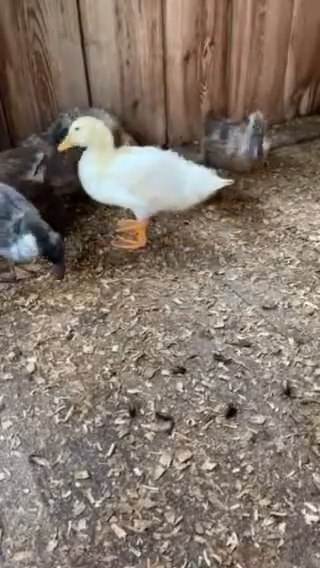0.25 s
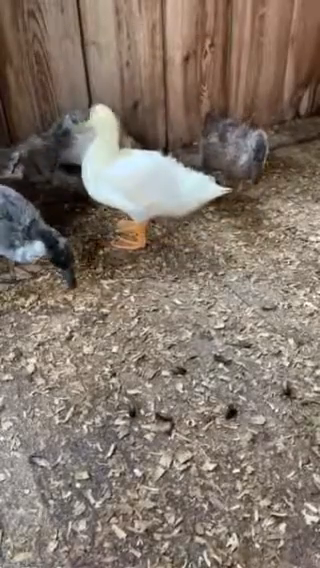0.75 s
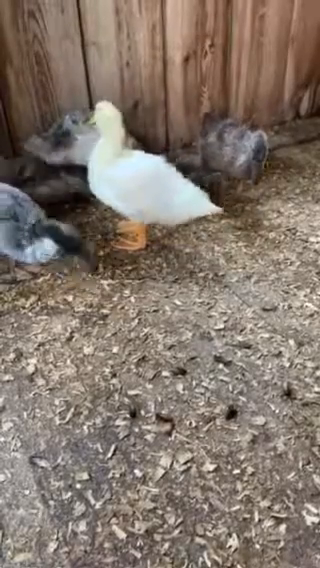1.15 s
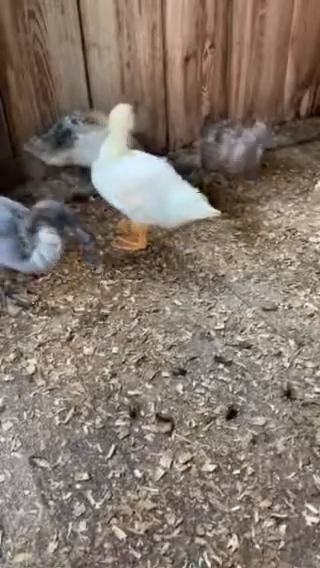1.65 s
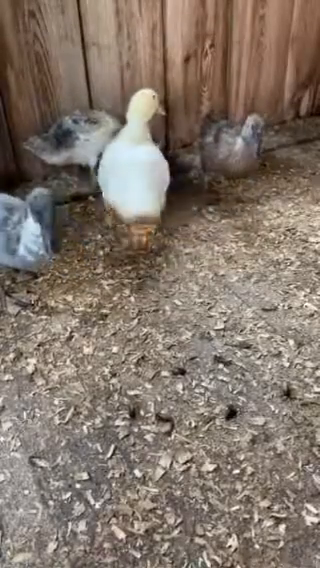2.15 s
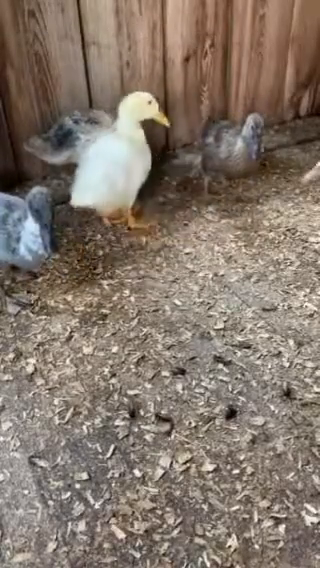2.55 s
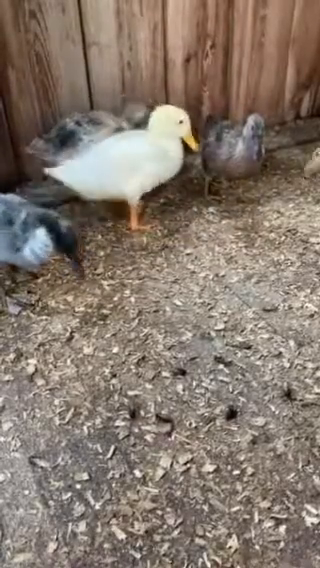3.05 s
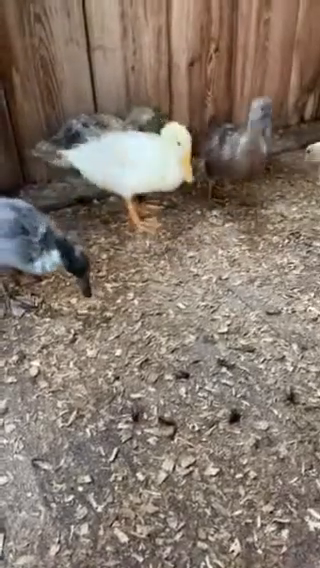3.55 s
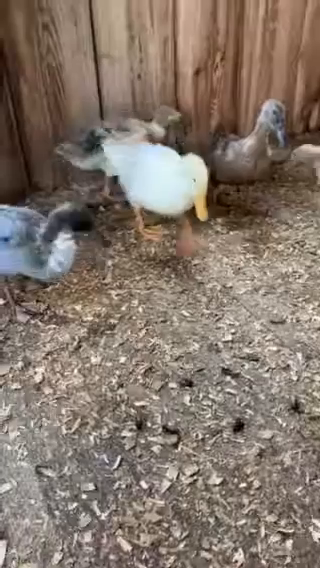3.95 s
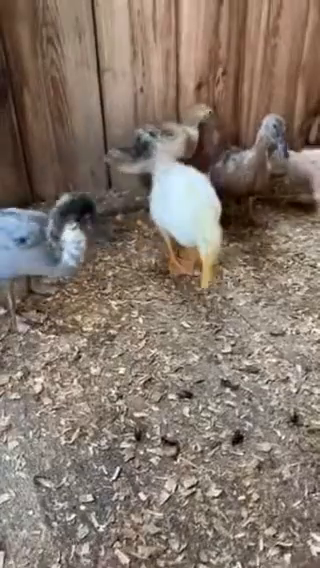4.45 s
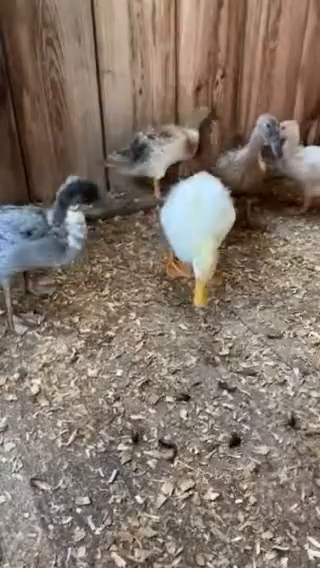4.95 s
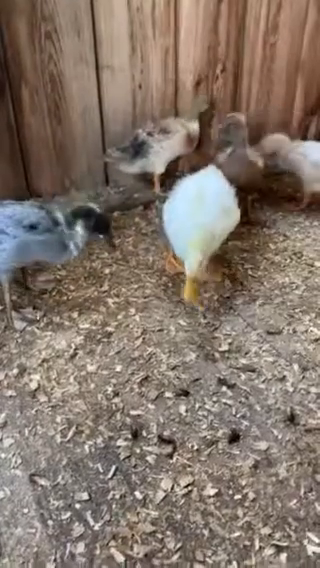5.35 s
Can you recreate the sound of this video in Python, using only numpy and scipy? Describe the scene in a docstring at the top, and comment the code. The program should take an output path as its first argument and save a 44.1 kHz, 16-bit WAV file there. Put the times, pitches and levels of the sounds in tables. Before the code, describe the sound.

Young ducks give soft, high, whistling peeps in loose bursts while feet thump and rustle through dry shavings in a small boarded pen.

```python
"""In a corner of a boarded pen, half-grown ducks whistle a couple of metres from a phone; a far bird chirps once.
Their near-sine calls waver, carry overtones and breath noise, and echo off the boards.
Feet thump and crunch the bedded floor as short ringing notes, and blows ring the modes of a wooden board.
Filtered noise makes the shavings rustle and tick, over outdoor air and a low rumble."""
import sys
import numpy as np
from scipy import signal
from scipy.io import wavfile
from scipy.ndimage import uniform_filter1d

SR = 44100
rng = np.random.default_rng(int(sys.argv[2]) if len(sys.argv) > 2 else 0)


def master(y):
    """Save y as 16-bit WAV."""
    cut = np.clip(np.atleast_2d(y).T, -1, 1)
    pcm = np.round(cut * 32767)  # scale
    wavfile.write(sys.argv[1], SR, pcm.astype(np.int16))


N = 246519

TREBLE_LIKE, MIDDLE_LIKE = .85, .3  # how alike left and right are: in the treble, and in ticks up to 6 kHz
LEFT_DELAY_S = .00027  # delay of the left channel in such sound


def undb(db):
    """Turn decibels into a plain gain."""
    return 10 ** (np.asarray(db) / 20)


def unit(x):
    """Scale a sound to an average (rms) level of 1."""
    return x / np.sqrt(np.mean(x ** 2))


def band(x, hz, width_hz):
    """Two-pole band-pass, gain 1 at the centre."""
    return signal.lfilter(*signal.iirpeak(min(hz, .4 * SR), hz / width_hz, fs=SR), x)


def walk(rate, size=N):
    """Smooth random wander, spread 1; a higher rate in Hz wanders faster."""
    k = max(int(SR / rate), 2)
    noise = rng.standard_normal(size + 2 * k)
    smooth = uniform_filter1d(uniform_filter1d(noise, k), k)
    return unit(smooth[k:-k])


def pair(x, like):
    """Mix two noises into a left and a right with the given likeness."""
    like = np.clip(like, -1, 1)
    shared = np.sqrt(1 + like) * x[0]
    apart = np.sqrt(1 - like) * x[1]
    return np.array([shared + apart, shared - apart]) / np.sqrt(2)


def late_left(x, like):
    """Mix two noises by the given likeness, with the left slightly delayed."""
    left, right = pair(x, like)
    return np.array([np.roll(left, int(LEFT_DELAY_S * SR)), right])


def add(out, s, x):
    """Lay a sound into the output, starting at s seconds."""
    i = int(s * SR)
    out[..., i:i + x.shape[-1]] += x[..., :N - i]


def curve(table):
    """Join the rows of a table by straight lines: each column becomes one value per sample."""
    s, *columns = np.transpose(table)
    return [np.interp(np.arange(N) / SR, s, c) for c in columns]


def uneven(shape, spread_db):
    """Noise whose samples differ widely in strength, like many small knocks."""
    size_db = spread_db * np.minimum(rng.exponential(size=shape), 6)
    return rng.standard_normal(shape) * undb(size_db)


def flakes(lo_hz, hi_hz, count, sharp, patchy_db, channels=2):
    """Many small pieces, each ringing briefly at its own pitch when uneven knocks excite it."""
    out = 0
    for hz in np.geomspace(lo_hz, hi_hz, count):
        ring = unit(band(uneven((channels, N), 3.5), hz, hz / sharp))
        out = out + ring * undb(patchy_db * walk(38.0))
    return unit(out)


# tone colour of the outdoor air: (f/Hz, relative level/dB)
YARD_AIR = [(15, -29), (25, -59), (216, 7), (448, -14.5), (636, -35), (953, -24.5), (1320, -19.5),
            (1470, -3), (2320, -74.5), (3570, -30.5), (7810, -60), (9690, -58), (15800, -63.5)]
YARD_DB = -64  # overall level of the air


def yard():
    """Outdoor air in third-octave bands that flicker alone, and a rumble that swells with footfalls."""
    air, (table_hz, table_db) = 0, np.transpose(YARD_AIR)
    for hz in 100 * 2 ** np.arange(0, 7.4, 1 / 3):
        noise = band(band(rng.standard_normal((2, N)), hz, hz / 3), hz, hz / 2)
        # the bass is alike left and right, the middle is not
        stereo = pair(noise, max(1.1 - hz / 900, 0)) if hz < 5000 else late_left(noise, TREBLE_LIKE)
        level_db = np.interp(np.log(hz), np.log(table_hz), table_db)
        air = air + stereo * undb(level_db + 5.7 * walk(24.0))
    noise = rng.standard_normal((2, N))
    deep = unit(band(band(noise, 40.0, 34), 43, 75))
    upper = unit(band(band(noise, 65.4, 30.0), 108.0, 60.0))
    rumble = pair(deep + .5 * upper, 0.88) * undb([[-.8], [.8]])
    return unit(air) * undb(YARD_DB) + rumble * boom()


BOOM_RISE_S, RUMBLE_DB = 0.027, -62  # time to the top of a swell; steady part of the rumble's gain


def boom():
    """Each footfall shakes the ground for a moment: a swell and decay over the steady rumble."""
    power = undb(RUMBLE_DB) ** 2 * undb(1.7 * walk(23.0))
    t = np.arange(int(.5 * SR)) / SR / BOOM_RISE_S  # time counted in rise times
    for s, *_, boom_db in FOOTFALLS:
        add(power, s, (undb(boom_db) * t * np.exp(1 - t)) ** 2)
    return np.sqrt(power)


# hiss high up, before the shuffling lifts it and the final mix trims it: (f/Hz, width/Hz, level/dB)
HIGH_HISS = [(8200, 960, -86), (11000, 2200, -90), (15100, 1300, -94)]
# shuffling in the bedding, before trims:
# (t/s, dull rustle level/dB, middle scrape level/dB, bright hiss level/dB)
BEDDING = [(0.0, -50.5, -83, -91), (0.25, -49.5, -47.5, -77), (0.4, -64, -64, -72),
           (0.75, -68.5, -83, -74.5), (1.09, -62.5, -64.5, -70.5), (1.5, -69, -72, -72),
           (1.9, -68, -72.5, -77), (2.09, -54.5, -88, -64), (2.17, -54.5, -67, -72.5),
           (2.4, -60, -79, -70.5), (2.68, -61.5, -54, -78.5), (2.94, -61.5, -83, -77.5),
           (3.15, -60, -58, -65), (3.36, -71, -71.5, -76), (3.52, -80, -49.5, -69), (3.66, -83, -96, -74),
           (3.9, -60, -70, -68.5), (4.4, -68.5, -88, -70.5), (4.62, -68, -85.5, -82.5),
           (4.67, -62, -66.5, -74), (4.76, -64, -67, -74), (4.97, -60.5, -63, -78),
           (5.15, -63.5, -64.5, -74.5), (5.22, -72.5, -73.5, -80), (5.3, -77.5, -87.5, -83),
           (5.34, -57, -76, -85), (5.42, -73, -82, -82), (5.59, -62, -67, -80.5)]


def shuffle():
    """Moving shavings: a dull, a middle and a bright layer; the bright one lifts the hiss up high."""
    rustle_db, scrape_db, hiss_db = curve(BEDDING)
    high = 0
    for hz, width_hz, db in HIGH_HISS:
        fine = late_left(uneven((2, N), 3), TREBLE_LIKE)
        hiss = unit(band(band(fine, hz, width_hz), hz, width_hz))
        high = high + hiss * undb(db + 1.9 * walk(21)) * (1 + undb(hiss_db + 78))
    scrape = flakes(1400, 2800, count=10, sharp=12, patchy_db=3) * undb(scrape_db - 2.0)
    bright = flakes(3270, 6220, count=6, sharp=9.4, patchy_db=6.0) * undb(hiss_db + 3 + 3.0 * walk(23))
    rustle = flakes(421, 1285, count=6, sharp=6.3, patchy_db=6.0) * undb(rustle_db)
    return rustle + scrape + bright + high


TICK_RISE_S, TICK_PAN_DB = .0045, -2  # quick swell; left minus right
# ticks in the shavings: (t/s, level/dB before trim, guide f/Hz, time to fall 60 dB/s before limits)
FLAKE_TICKS = [(0.192, -37.5, 3650, 0.51), (0.317, -41, 3950, 0.21), (0.442, -48, 3980, 0.25),
               (1.088, -46.5, 4000, 0.14), (0.924, -43, 8950, 0.019), (1.185, -47, 6300, 0.14),
               (1.329, -51, 4570, 0.21), (1.353, -53.5, 4500, 0.49), (1.5415, -52.5, 4400, 0.53),
               (1.656, -54, 8060, 0.34), (1.923, -39.5, 3470, 0.074), (1.947, -44, 3950, 0.46),
               (2.107, -41.5, 3570, 0.12), (2.595, -46.5, 7400, 0.12), (3.299, -46.5, 4860, 0.15),
               (3.481, -43.5, 5230, 0.22), (3.916, -39.5, 8650, 0.078), (3.982, -51, 9100, 0.34),
               (4.102, -45.5, 4700, 0.22), (4.196, -52, 4060, 0.45), (4.199, -41, 10600, 0.045),
               (4.266, -41.5, 7760, 0.09), (4.35, -45, 8400, 0.096), (4.667, -51.5, 4120, 0.23),
               (4.8, -47, 11100, 0.32), (4.826, -50, 4300, 0.21), (4.884, -32.5, 4960, 0.036),
               (4.894, -46.5, 4930, 0.29), (5.049, -57, 4380, 0.43), (5.5497, -55, 6200, 0.18)]


def ticks():
    """Dry flakes slide and snap: a quick swell, then a short uneven spray of noise."""
    out, t = np.zeros((2, N)), np.arange(int(.3 * SR)) / SR
    pan = undb([[TICK_PAN_DB / 2], [-TICK_PAN_DB / 2]])
    for s, db, hz, t60 in FLAKE_TICKS:
        like = TREBLE_LIKE if hz > 6000 else MIDDLE_LIKE
        noise = late_left(rng.standard_normal((2, len(t))), like)
        spray = unit(band(band(noise, 0.97 * hz, 0.59 * hz), 1.3 * hz, 1.93 * hz))
        spray = spray * undb(walk(360, size=len(t)))
        fall = undb(-60 * t / np.clip(t60, .02, .4)) + 0.98 * undb(-60 * t / 0.0067)  # slide and snap
        fall = fall * np.clip(t / TICK_RISE_S, 0, 1)
        add(out, s - .003, undb(db - 11.5) * spray * fall * pan)
    return out


# knocks on wood: (t/s, level/dB before the mode levels)
WOOD_KNOCKS = [(0.043, -46), (0.088, -50), (0.207, -57), (0.927, -45.5), (1.358, -68), (2.219, -45.5),
               (2.8623, -47.5), (4.339, -68), (5.05, -64.5)]
# ringing modes of the board: (f/Hz before small detuning, level/dB relative to the knock, time to fall 60 dB/s)
BOARD_MODES = [(238.7, 1.5, 0.19), (350, 1.5, 0.1), (775, 1, 0.076), (1232, 18, 0.031), (1321, 18.5, 0.029),
               (1620, 6, 0.043)]


def knocks():
    """Blows from a soft body ring the modes of a wooden board."""
    out, t = np.zeros(N), np.arange(int(.3 * SR)) / SR
    swell = np.clip(t / 0.008, 0, 1) ** 2  # a soft body hits, so the push builds up
    for s, db in WOOD_KNOCKS:
        for hz, mode_db, t60 in BOARD_MODES:
            size, tune = rng.standard_normal(2)  # every blow differs a little
            ring = np.sin(2 * np.pi * hz * (1 + 0.0068 * tune) * t)
            add(out, s, swell * undb(db + mode_db + 2.5 + size - 60 * t / t60) * ring)
    return out


STEP_T60_S, STEP_T60_SLOPE = 0.24, 0.58  # ring time of a 207 Hz note; power of pitch by which it grows
# footfalls, before trims: (t/s, level/dB, ground note f/Hz, crunch level/dB relative to the step, boom level/dB)
FOOTFALLS = [(0.044, -29.5, 247.4, 2, -55), (0.093, -27, 85.6, -6, -43), (0.191, -38.5, 209, -9, -60),
             (0.209, -28.5, 240, 2.5, -55), (0.28, -37, 237.4, 6.5, -55), (0.485, -54, 60.2, -23, -76),
             (0.566, -49, 126, 4.5, -80), (0.821, -44, 84, -37, -52), (0.929, -34.5, 247, -1, -55),
             (1.063, -33, 141, -14, -49), (1.217, -25, 65, -41, -43), (1.414, -34.5, 79.5, -32, -54.5),
             (1.656, -36.5, 151.3, -3, -47), (1.911, -45.5, 232, 3, -55.5), (2.05, -40, 242, 0, -80),
             (2.218, -41, 230.6, 7, -54.5), (2.593, -41, 345, -1, -47.5), (2.644, -38.5, 275, 3.5, -81),
             (2.864, -37, 224.7, -7, -73), (3.116, -42.5, 163, 7, -52.5), (3.253, -42.5, 291, 8.5, -63),
             (3.446, -43.5, 329, 1, -65), (3.499, -28.5, 86.3, -48, -43.5), (3.67, -48.5, 219, -15, -56),
             (4.017, -41.5, 198.6, -6.5, -46), (4.058, -39, 120, -38, -55), (4.264, -34, 170, -12, -59),
             (4.3, -32, 139.4, -48, -51), (4.35, -38, 210.5, -4, -48.5), (4.39, -43, 135, -50, -72),
             (4.533, -45, 191, -14, -58), (4.797, -39, 340, 0, -47.5), (4.926, -50, 460, 2, -60),
             (5.053, -37, 165, -13, -54), (5.134, -48, 155.5, -22, -62), (5.362, -34.5, 167, -31, -53.5),
             (5.394, -44.5, 235, -17, -61)]


def steps():
    """A foot lands as a push that rings the ground, part tone and part noise, and crunches the shavings."""
    thud, press = np.zeros(N), np.zeros(N)
    t = np.arange(int(.4 * SR)) / SR
    for s, db, hz, crunch_db, _ in FOOTFALLS:
        t60 = STEP_T60_S * (hz / 207.0) ** STEP_T60_SLOPE
        slow_tail = 0.058 * undb(-60 * t / 0.43) * (1 - t / t[-1])
        fall = undb(-60 * t / np.clip(t60, .03, .6)) + slow_tail
        fall = fall * np.clip(t / 0.0053, 0, 1)
        tone = np.sin(2 * np.pi * hz * t)
        ragged = unit(band(band(rng.standard_normal(len(t)), hz, 0.33 * hz), hz, 1.01 * hz))
        higher = unit(band(rng.standard_normal(len(t)), 2.7 * hz, 0.22 * hz))
        note = 0.38 * tone + 0.6 * ragged + 0.1 * higher
        add(thud, s - .003, undb(db - 1.5) * note * fall)
        add(press, s - .001, undb(db + crunch_db - 10.5) * fall)
    shavings = flakes(361, 2200, count=9, sharp=5.0, patchy_db=6.5)
    return thud, press * band(shavings, 1460, 1900)


PEN_T60_S = .18  # time in which the dull part of the echo falls 60 dB


def boards(x):
    """Echo of the pen: a decaying hail of reflections, duller with time, unlike left and right."""
    t = np.arange(int(.5 * SR)) / SR
    hail = rng.standard_normal((2, len(t))) * undb(8.1 * rng.standard_normal((2, len(t))))
    dull = signal.sosfilt(signal.butter(2, 2600, fs=SR, output="sos"), hail)
    tail = dull * undb(-60 * t / PEN_T60_S) + .5 * hail * undb(-60 * t / 0.01)
    tail = tail * (t > .004)  # the first reflection takes 4 ms
    return signal.fftconvolve(x[None], tail / np.sqrt(np.sum(tail[0] ** 2)), axes=1)[:, :N]


PEEP_TURN, PEEP_GLIDE = 0.61, 0.46  # turning point as a share of the length; share of the glide done by then
PEEP_START_DB, PEEP_END_DB = 0, -1.5  # level at both ends relative to the turning point
EFFORT = 0.28  # extra dB an overtone in SHORT_PEEPS loses per dB below the level at the turning point
RASP, THROB_HZ = .3, 61.15  # for SHORT_PEEPS: noisy flutter of the overtones, 0-1; beat of the throat
# short peeps of the ducks, and one high chirp of a distant bird at 1.48 s;
# pitch before wobble, level before trim, overtones relative to the level:
# (t/s, length/s, first f/Hz, last f/Hz, level/dB, 2nd harmonic level/dB, 3rd harmonic level/dB,
#  hoarseness/share, echo level/dB, left minus right level/dB, left lead/ms)
SHORT_PEEPS = [(0.035, 0.028, 1542, 1314, -41.5, -45, -29, 0.3, -19, 6, -0.0072),
               (0.197, 0.035, 2243, 2356, -53.5, -8, -25, 0.14, -3, 8, -0.064),
               (0.233, 0.021, 2410, 2480, -56, -25, -35, 0.32, -5, 3, 0.033),
               (0.252, 0.051, 1950, 1845, -53, -2, -25, 0.17, -5, 0, 0.3),
               (0.265, 0.037, 1773, 1463, -47, -30, -21, 0.3, -5, 8, -0.19),
               (0.288, 0.052, 1914, 1886, -43.5, -14.5, -29, 0.08, -14, 8.5, 0.17),
               (1.128, 0.032, 1826, 1320, -61.5, -30, -42, 0.25, -8, 2, 0.026),
               (1.481, 0.071, 7470, 7600, -69.5, -38, -48, 0.25, -2, 4, 0),
               (2.104, 0.086, 1690, 1880, -47.5, -17, -27, 0.83, -9, 3, 0.13),
               (2.227, 0.029, 1578, 1913, -52, -25, -9.5, 0.26, -3, -6, 0.14),
               (2.244, 0.041, 1988, 1843, -59.5, -2, -20, 0.32, -1, -1, 0.2),
               (2.264, 0.069, 982, 946, -52.5, -12, -29, 0.25, -7, 15, 0.38),
               (2.292, 0.027, 1737, 1425, -50, -37, -35, 0.25, -8, 0, 0),
               (2.309, 0.061, 1403, 1653, -52, -35, -21, 0.3, -10, -1, -0.18),
               (2.329, 0.049, 1716, 1813, -59.5, -8, -1, 0.18, 1, -8, 0.206),
               (2.36, 0.038, 1920, 1807, -52, -12, -27, 0.6, -6.5, -3, 0.1),
               (2.697, 0.024, 1965, 1643, -59, -22, -35, 0.8, 0, -1, 0),
               (2.995, 0.022, 2010, 1930, -62.5, 2.5, -24, 0.4, 1, 0, 0),
               (3.054, 0.06, 1927, 1867, -61, -2.5, -5.5, 0.35, 3, -8, -0.013),
               (3.114, 0.05, 1607, 1552, -46.5, -49, -38, 0.15, -13.5, 4, -0.045),
               (3.143, 0.029, 1747, 1996, -58, -2.5, -7, 0.15, 4, -5, 0.0019),
               (3.153, 0.062, 2240, 2110, -50.5, -10.5, -37, 0.38, -10.5, 1, -0.17),
               (3.297, 0.02, 2210, 1470, -53, -39, -45, 0.6, -6, 11, 0.31),
               (3.442, 0.032, 1806, 2306, -57, -20, -30, 1.1, -1, 14, 0.072),
               (3.836, 0.074, 1946, 2167, -60, -14.5, -23, 0.24, -2.5, -3, -0.00047),
               (4.659, 0.04, 2314, 2310, -79, -33.5, -37, 0.36, -3, 0, 0),
               (4.955, 0.13, 2870, 2880, -80, -30, -40, 0.17, -15, 0, 0),
               (4.996, 0.076, 1890, 1984, -72, -30, -40, 0.37, -6, -7, -0.14),
               (5.086, 0.022, 1885, 1870, -70.5, -30, -40, 0.16, -1, -2, -0.064)]
# calls drawn point by point: an opening peep and four long whistles; same conventions:
# (t/s, f/Hz, level/dB, 2nd harmonic level/dB, 3rd harmonic level/dB)
CURVED_CALLS = [
    [(0.002, 1920, -42, -22, -35), (0.011, 1685, -36, -27, -31), (0.022, 1613, -34, -20.5, -17),
     (0.032, 1593, -44.5, -19, -19.5), (0.044, 1598, -41, -12, 2)],
    [(0.935, 1647, -52, -35, -19), (0.946, 1630, -46, -32, -25), (0.958, 1763, -55, -28, -13),
     (0.975, 1774, -49, -11, -20.5), (0.99, 1850, -51.5, -13, -30), (1.012, 1840, -55, -17, -33),
     (1.038, 1932, -43.5, -19, -34), (1.058, 1905, -47.5, -12, -36), (1.078, 1924, -47, -20, -36),
     (1.126, 1920, -50, -6, -42), (1.152, 1932, -57, -24, -44), (1.164, 1934, -62, -22, -42),
     (1.18, 1890, -66, -20, -40), (1.215, 1890, -81, -30, -40)],
    [(1.903, 1274, -43.5, -36, -54), (1.915, 1588, -47, -25, -57), (1.945, 1671, -33, -19, -59),
     (1.965, 1665, -35, -20.5, -50), (1.985, 1670, -29, -34.5, -49.5), (2.014, 1727, -37.5, -31.5, -30.5),
     (2.022, 1780, -45, -31, -27.5), (2.031, 1738, -36.5, -17.5, -32), (2.06, 1738, -36.5, -22.5, -32),
     (2.078, 1680, -37.5, -19.5, -30.5), (2.093, 1684, -33.5, -18, -47), (2.099, 1560, -39, -30, -40),
     (2.125, 1270, -49, -42, -56)],
    [(2.885, 2324, -64, -8, -38), (2.93, 2286, -61, -11, -22), (2.96, 2234, -57.5, -3, -19),
     (3.0, 2170, -55.5, -4, -24), (3.02, 2215, -52, -8, -24), (3.055, 2127, -59.5, 2, -33),
     (3.085, 2085, -57, -3.5, -38), (3.112, 2110, -55, -8, -42)],
    [(3.668, 1055, -59, -35, -45), (3.698, 1562, -55.5, -20, -42), (3.706, 1686, -51, -23, -41),
     (3.74, 1784, -45.5, -20, -36), (3.771, 1690, -58, -18, -35), (3.778, 1758, -43, -20, -35),
     (3.8, 1800, -45, -22, -33), (3.82, 1804, -47.5, -14, -36), (3.855, 1833, -45, -25, -38),
     (3.892, 1842, -52.5, -17, -38), (3.912, 1303, -54.5, -29, -45), (3.93, 1220, -72, -30, -42)],
]
# voice of each curved call: (hoarseness/share, echo level/dB, left minus right level/dB, left lead/ms,
#  rasp of the overtones/share, throb f/Hz)
CURVED_VOICES = [(.02, -13, 0, -.078, .15, 60), (0.25, -7, 1, 0.18, .5, 75), (.03, -20, .2, .03, .6, 110),
                 (0.3, -6, -1.5, -0.17, .8, 90), (0.3, -11, 3.5, -0.11, .9, 97)]


def calls():
    """Every call as a curve and a voice; a short peep glides to its last pitch and fades a little."""
    short = []
    points = (0, 0, PEEP_START_DB), (PEEP_TURN, PEEP_GLIDE, 0), (1, 1, PEEP_END_DB)
    for s, length, hz0, hz1, db, second_db, third_db, *voice in SHORT_PEEPS:
        path = []
        for share, glide, off_db in points:
            overtone_db = EFFORT * off_db
            path.append((s + share * length, hz0 + glide * (hz1 - hz0), db + off_db,
                         second_db + overtone_db, third_db + overtone_db))
        short.append((path, (*voice, RASP, THROB_HZ)))
    return list(zip(CURVED_CALLS, CURVED_VOICES)) + short


SLOW_JITTER, QUICK_JITTER = .045, .035  # pitch wobble of a fully hoarse throat, as a share
SLACK_PER_OCT = 1.2  # hoarseness gained where the pitch sags under its usual height


def peeps():
    """Calls with two overtones; a hoarse throat wobbles pitch and level, and breath noise leaks out."""
    near, sent = np.zeros((2, N)), np.zeros(N)
    for table, (hoarse, echo_db, pan_db, lead_ms, rasp, throb_hz) in calls():
        s, hz, db, second_db, third_db = np.transpose(table)
        t = np.arange(s[0], s[-1], 1 / SR)
        size = len(t)
        sag = np.maximum(np.log2(np.median(hz) / hz) - .05, 0)
        hoarse = np.minimum(hoarse + SLACK_PER_OCT * np.interp(t, s, sag), 1)
        wobble = SLOW_JITTER * walk(93, size) + QUICK_JITTER * walk(500, size)
        hz = np.interp(t, s, hz) * (1 + hoarse * wobble)
        turn = 2 * np.pi * np.cumsum(hz) / SR
        # the throat throbs at a quick, slightly uneven beat
        throb = np.sin(2 * np.pi * (throb_hz * t + rng.random()) + 0.38 * walk(20, size))
        flutter = 1 + hoarse * (1.67 * throb + 0.54 * walk(160, size) + 0.73 * walk(560, size))
        flutter = flutter / np.sqrt(1 + 1.76 * hoarse ** 2)
        edge = np.clip(np.minimum(t - s[0], s[-1] - t) / .007, 0, 1)
        shift = np.pi * hz * lead_ms / 1000
        turns = turn + np.array([shift, 0 * shift, -shift])  # left, middle, right
        tone = 0
        for k, harmonic_db in enumerate((db, db + second_db, db + third_db), 1):
            overtone = k > 1  # only the overtones flicker and rasp
            level = undb(np.interp(t, s, harmonic_db) + 6 + 0.56 * overtone * walk(79, size))
            tone = tone + level * (1 + rasp * overtone * walk(600, size)) * np.sin(k * turns)
        breath = unit(band(band(rng.standard_normal(size), 1240, 530), 1000, 740))
        breath = breath * edge * undb(np.interp(t, s, db) - 20.5)
        call = tone * edge * flutter + breath
        wet = undb(echo_db)
        share = np.sqrt(1 + wet ** 2)  # splits the call between direct sound and echo
        add(near, s[0], call[::2] * undb([[pan_db / 2], [-pan_db / 2]]) / share)
        add(sent, s[0], call[1] * wet / share)
    return near, sent


def scene():
    """Mix all sources; calls and knocks also feed the echo of the boards."""
    near, sent = peeps()
    thud, crunch = steps()
    knock = knocks()
    right_heavy = undb([[-1.5], [1.5]])
    left_heavy = undb([[.5], [-.5]])
    echo = boards(sent + undb(-7) * knock)
    floor = thud * right_heavy + crunch + ticks() + undb(-3) * shuffle()
    return near + echo + knock * left_heavy + floor + yard()


TOP_HZ = 15880  # upper limit of the phone


def record(dry):
    """The phone cuts the deepest bass and the top."""
    dry = signal.sosfilt(signal.butter(2, 28, "high", fs=SR, output="sos"), dry)
    return signal.sosfilt(signal.ellip(10, .2, 70, TOP_HZ, fs=SR, output="sos"), dry)


dry = scene()
out = record(dry)
master(out)
```